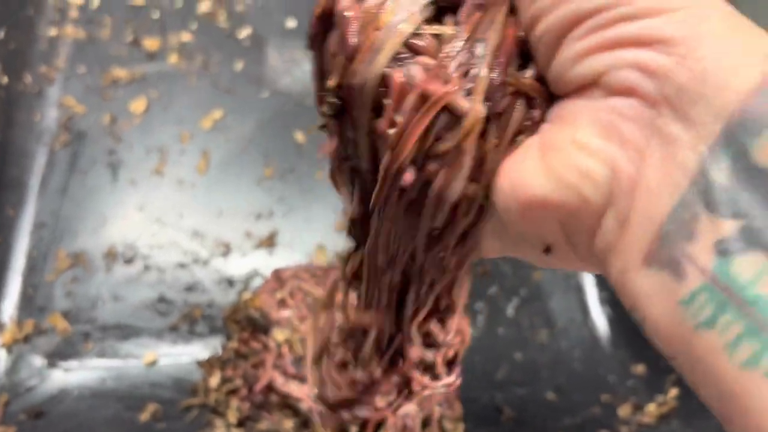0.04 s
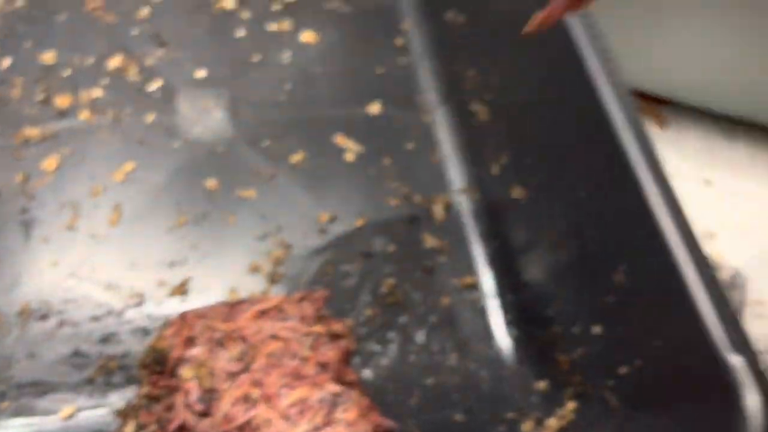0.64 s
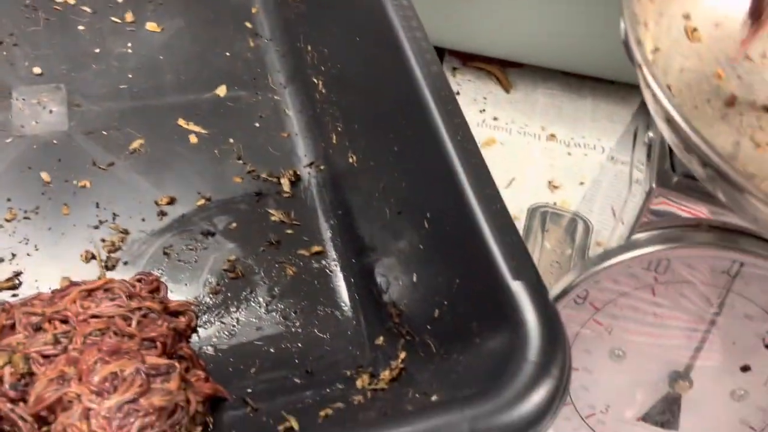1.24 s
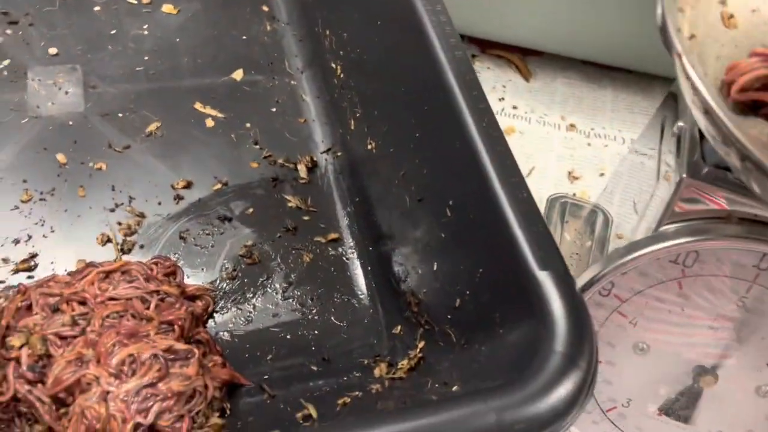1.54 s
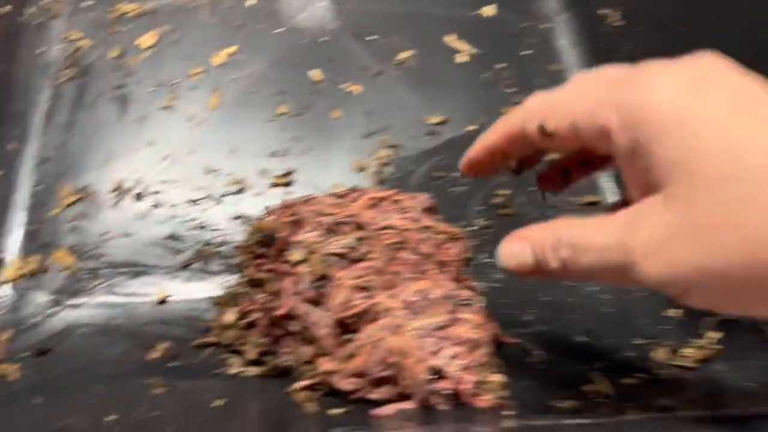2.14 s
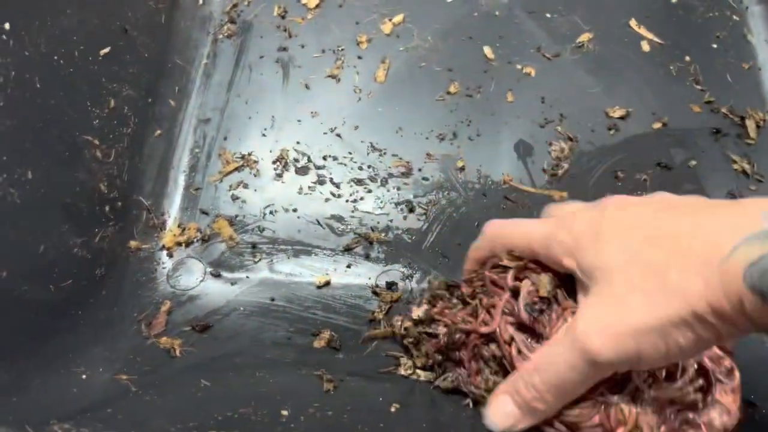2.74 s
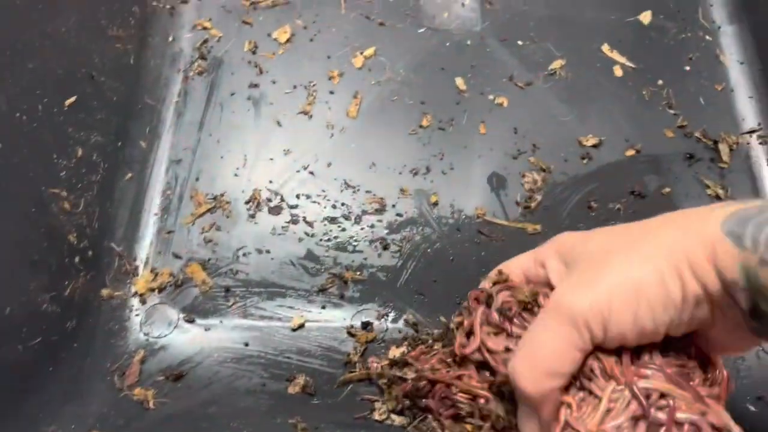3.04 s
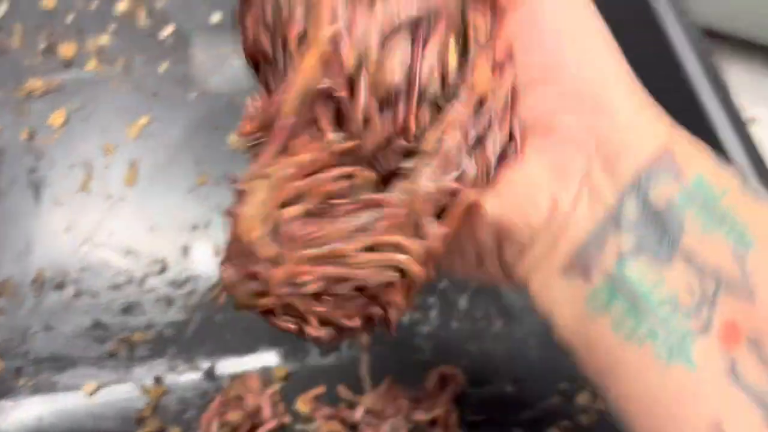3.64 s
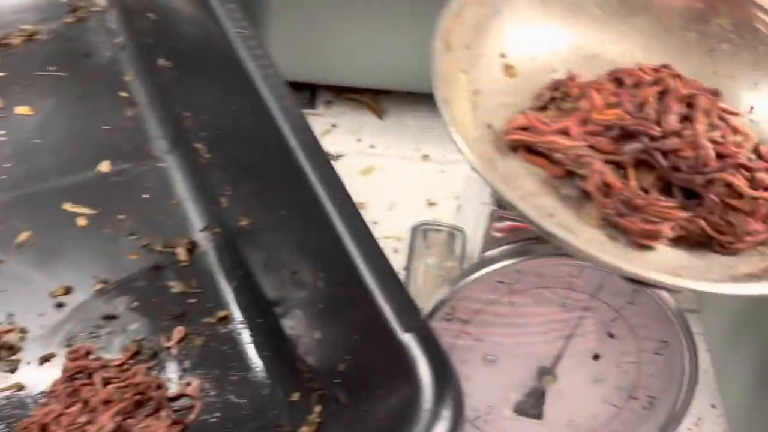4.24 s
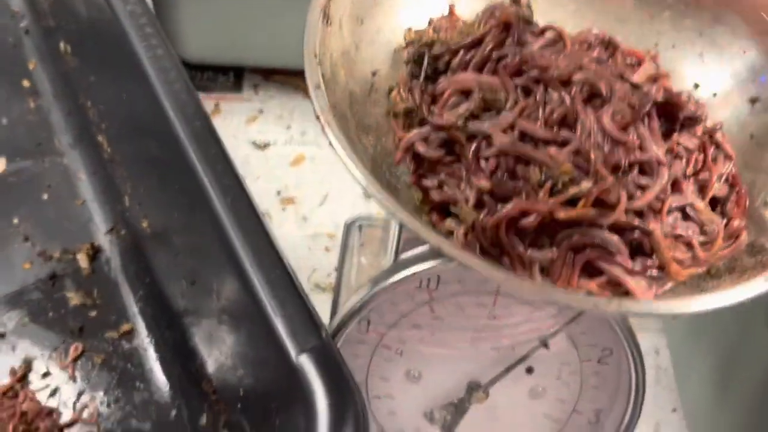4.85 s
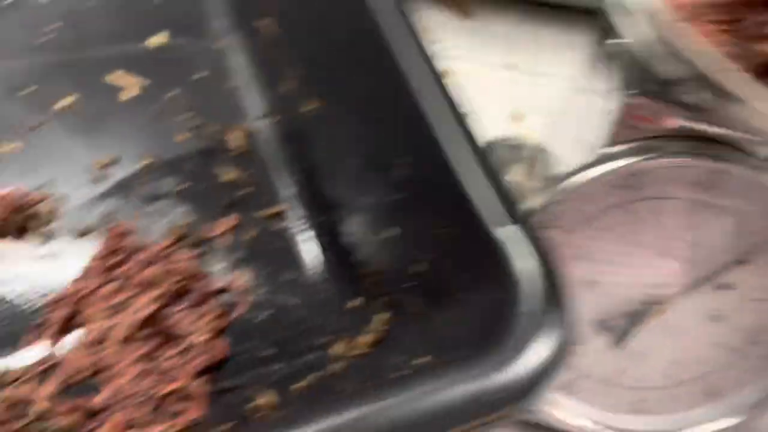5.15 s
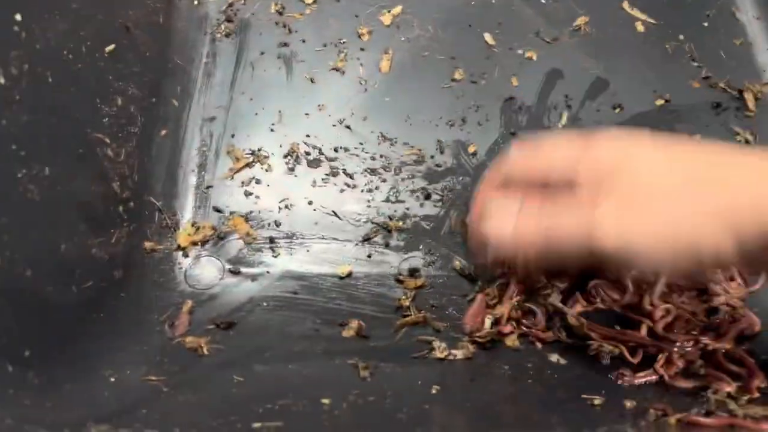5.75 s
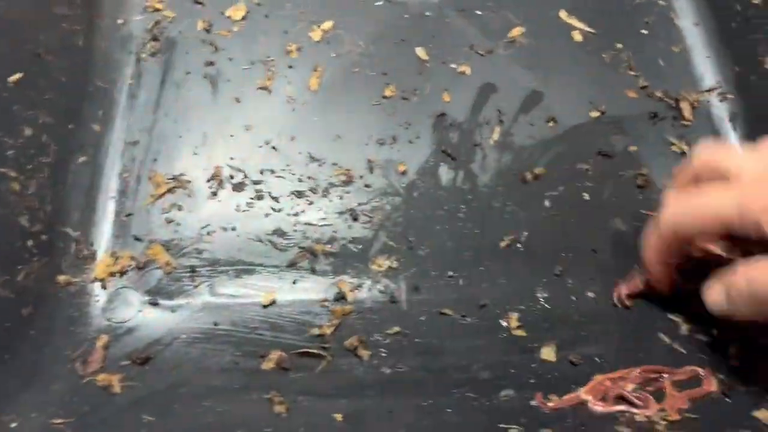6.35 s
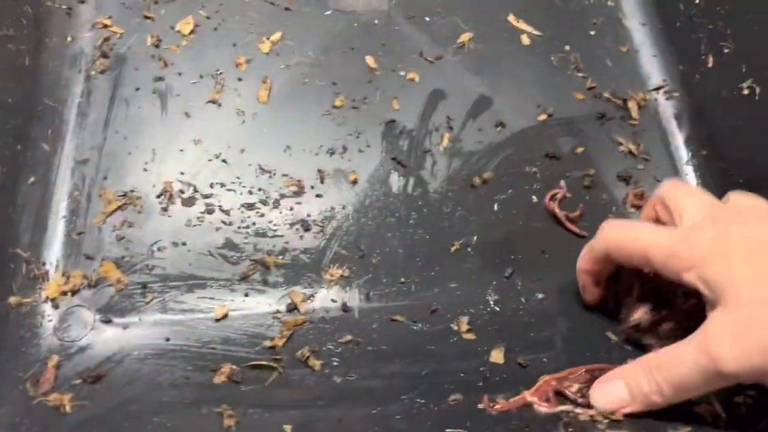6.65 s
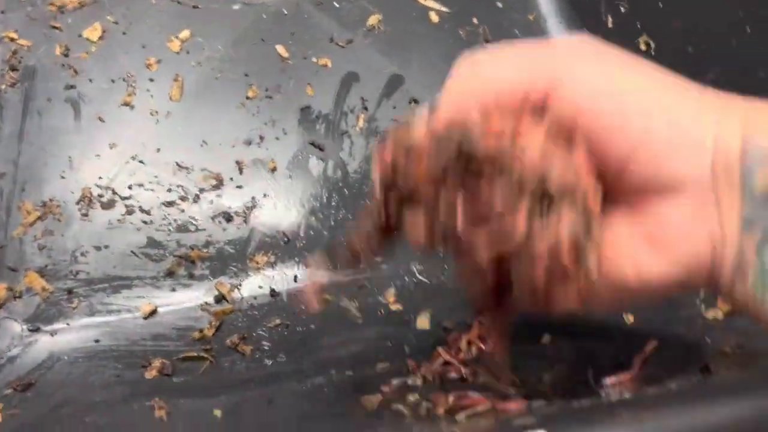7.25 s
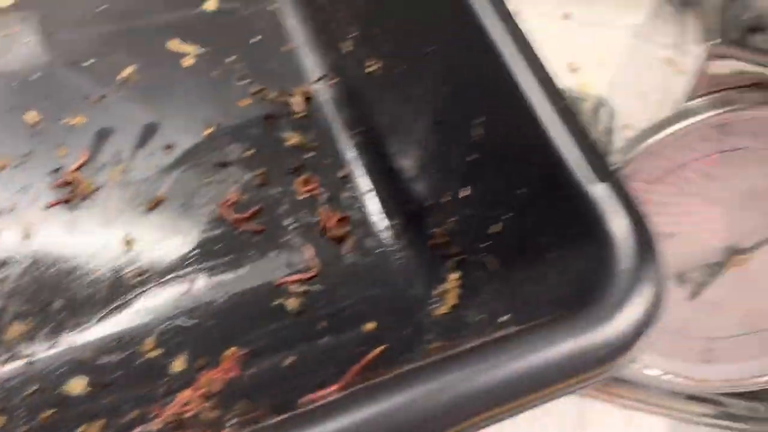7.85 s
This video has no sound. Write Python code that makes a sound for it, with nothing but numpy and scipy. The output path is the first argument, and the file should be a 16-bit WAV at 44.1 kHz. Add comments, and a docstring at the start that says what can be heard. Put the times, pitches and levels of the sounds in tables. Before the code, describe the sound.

A hand scoops a wet mass of worms from a thin plastic tray, making soft squelches, fine crackles and tiny pops. A handful patters dully into a metal bowl. The mass is then dragged with a gritty rumble, and a damp fingertip squeaks twice. Several hollow knocks on the tray follow, along with a brief fizzing wipe, while small wet sounds continue. The microphone is close, in a small room with a faint hum.

```python
"""Small room, phone microphone close to a thin plastic tray: a hand scoops compost worms into a bowl.
Over a faint hum, wet films and bubbles crackle, squelch and pop; fingers and clumps land, sending bending
waves through the tray. A handful patters into the metal bowl at 1.5 s. Near 2.9 s the dragged mass rumbles
and rasps, and a damp fingertip squeaks twice. Then come a hard landing (3.9 s), a softer handful (4.6 s),
another landing (5.6 s), a fizzing wipe (6.1 s) and the heaviest landing (6.4 s); small wet sounds go on."""
import sys
import numpy as np
from scipy import signal
from scipy.fft import rfft, irfft
from scipy.io import wavfile
from scipy.ndimage import uniform_filter1d

SR = 44100
rng = np.random.default_rng(int(sys.argv[2]) if len(sys.argv) > 2 else 0)


def store_wav(level_fs):
    """Save 16-bit WAV to argv[1]."""
    pcm = np.round(np.clip(np.atleast_2d(level_fs), -1, 1) * 32767)
    wavfile.write(sys.argv[1], SR, pcm.T.astype(np.int16))


N = 352800
TIME = np.arange(N) / SR


def undb(db):
    """Decibels to gain."""
    return 10 ** (np.asarray(db) / 20)


def unit(x):
    """Scale to rms 1."""
    return x / np.sqrt(np.mean(x ** 2))


def peaked(x, db):
    """Scale to a peak level."""
    return x * undb(db) / np.abs(x).max()


def decay(t, t60):
    """Envelope that falls 60 dB in t60 seconds."""
    return np.exp(-np.log(1000) * t / t60)


def band(x, low_hz, high_hz, order=2):
    """Causal band-pass."""
    return signal.sosfilt(signal.butter(order, [low_hz, high_hz], "band", fs=SR, output="sos"), x)


def ring(x, response):
    """Pass a sound through an impulse response."""
    return signal.fftconvolve(np.atleast_2d(x), np.atleast_2d(response), axes=1)[:, :x.shape[-1]]


def tint(x, colour, size=4096):
    """Minimum-phase filter through (f/Hz, gain/dB) points."""
    hz, db = np.transpose(colour)
    bin_hz = np.arange(size // 2 + 1) * SR / size
    gain = undb(np.interp(np.log(bin_hz + 1), np.log(hz), db))
    cepstrum = irfft(np.log(gain))
    cepstrum[1:size // 2] *= 2
    cepstrum[size // 2 + 1:] = 0
    return ring(x, irfft(np.exp(rfft(cepstrum))))


def sides(pan_db):
    """Gains at the two microphone ports; pan is left minus right."""
    return undb(np.array([[pan_db], [-pan_db]]) / 2)


def widen(shared, opposed, width):
    """Stereo from a mid and a side signal."""
    return shared + width * opposed * np.array([[1], [-1]])


def add(out, start, x):
    """Mix a sound in at a time in seconds."""
    i = max(int(start * SR), 0)
    out[:, i:i + x.shape[-1]] += x[..., :N - i]


def slips(per_s, spread_db):
    """Random tiny impulses: many weak ones, a few strong."""
    size = undb(spread_db * np.minimum(rng.exponential(size=N), 4))
    return (rng.random(N) < per_s / SR) * size * rng.choice([-1, 1], N)


def surges(rate_hz, depth_db):
    """Gain that lurches at random, as a soft mass moves in fits."""
    drift = signal.sosfilt(signal.butter(2, rate_hz, fs=SR, output="sos"), rng.standard_normal(N))
    return unit(undb(depth_db * np.clip(unit(drift), -2, 2)))


def snap(hz, cycles, lag, size=160):
    """Damped pings of a few cycles, one row each, starting lag samples late."""
    turns = np.maximum(np.arange(size) - lag[:, None], 0) * hz[:, None] / SR
    return np.sin(2 * np.pi * turns) * np.exp(-turns / cycles[:, None])


def gesture(peak_s, swell_s, fade_s, roundness=1.244):
    """Effort of one hand movement: swells to 1 and fades."""
    away = np.maximum((peak_s - TIME) / swell_s, (TIME - peak_s) / fade_s)
    return np.exp(-np.minimum(away, 12) ** roundness)


# spectrum of the air in the small room: f/Hz, relative level/dB
AIR_COLOUR = [(15, -37), (25, -19.5), (53, 1.5), (80, 0.5), (190, -14), (754, -29), (962, -32), (1890, -26),
              (3920, -29), (7510, -30), (9070, -37.5), (10100, -57), (11900, -53.5), (13600, -37.5),
              (16000, -70.5)]


def room_tone(air_db=-68, hum_hz=78.4, hum_db=-69.5):
    """Quiet air all round the microphone, with a wavering appliance hum."""
    shared, opposed = rng.standard_normal((2, N))
    air = unit(tint(widen(shared, band(opposed, 270, 18000), 0.5), AIR_COLOUR))
    hum = unit(band(rng.standard_normal(N), hum_hz - 3, hum_hz + 3))
    return undb(air_db) * air + undb(hum_db) * hum


def crackle(count, low_hz, high_hz, spread_db, cycles, lag_samples):
    """Wet films breaking all over the mass; each reaches the two ports with its own lag."""
    when, pitch, strength, place, length = rng.random((count, 5)).T
    hz = low_hz + (high_hz - low_hz) * pitch
    size = undb(spread_db * np.minimum(-np.log(strength), 3)) * np.sqrt(hz)
    ports = []
    for side in (1, -1):
        lag = 10 + side * lag_samples * (place - .5)
        pings = size[:, None] * snap(hz, cycles * (.5 + length), lag)
        index = (when * N).astype(int)[:, None] + np.arange(pings.shape[1])
        ports.append(np.bincount(index.ravel(), pings.ravel(), N)[:N])
    return unit(np.array(ports))


# worms stretched apart: strongest at t/s, swell/s, fade/s, wet level/dB
PEELS = [(0.04, 0.17, 0.45, -62), (0.181, 0.049, 0.078, -55), (1.102, 0.033, 0.064, -61),
         (1.35, 0.14, 0.1, -56), (2.1, 0.98, 0.095, -73), (3.15, 0.075, 0.35, -59),
         (3.62, 0.18, 0.17, -54.5), (4.52, 0.16, 0.088, -52.5), (4.85, 0.86, 0.46, -64),
         (5.741, 0.057, 0.052, -52.5), (6.099, 0.11, 0.17, -61.5), (7.031, 0.18, 0.098, -59.5),
         (7.424, 0.0068, 0.0097, -55.5), (7.99, 0.12, 0.087, -57.5)]
# the mass pushed or set down: strongest at t/s, swell/s, fade/s, drag level/dB, rasp level/dB
PUSHES = [(0.199, 0.026, 0.02, -52, -66), (1.44, 0.044, 0.17, -54, -57.5), (1.68, 0.035, 0.094, -58, -61.5),
          (2.532, 0.044, 0.059, -43.5, -49.5), (2.82, 0.13, 0.078, -39.5, -40),
          (2.93, 0.13, 0.065, -46.5, -46.5), (3.1, 0.6, 0.21, -66.5, -57),
          (3.581, 0.094, 0.068, -54.5, -55), (3.97, 0.036, 0.12, -56, -56.5),
          (4.573, 0.074, 0.073, -61.5, -51), (4.94, 0.076, 0.054, -68.5, -60),
          (5.479, 0.15, 0.36, -64, -62.5), (5.65, 0.059, 0.089, -45.5, -55),
          (6.121, 0.19, 0.13, -55, -51.5), (6.27, 0.086, 0.044, -51.5, -58.5),
          (6.528, 0.056, 0.16, -42.5, -49), (6.67, 0.019, 0.064, -46.5, -54),
          (6.859, 0.16, 0.23, -68.5, -59), (7.262, 0.028, 0.012, -59.5, -65.5),
          (7.35, 0.034, 0.092, -61, -68.5), (7.99, 0.086, .1, -88, -60.5)]


def efforts(crawl_wet_db=-80.5, crawl_rasp_db=-89.5, squeeze_db=-5.5):
    """Drag, rasp and wet envelopes over the worms' own crawl: pushes drive all three, peels the last."""
    drag_power, rasp_power, wet_power = 0, undb(crawl_rasp_db) ** 2, undb(crawl_wet_db) ** 2
    for peak_s, swell_s, fade_s, drag_db, rasp_db in PUSHES:
        push = gesture(peak_s, swell_s, fade_s)
        drag_power += (undb(drag_db) * push) ** 2
        rasp_power += (undb(rasp_db) * push) ** 2
    for peak_s, swell_s, fade_s, db in PEELS:
        wet_power += (undb(db) * gesture(peak_s, swell_s, fade_s)) ** 2
    wet_power += undb(squeeze_db) ** 2 * rasp_power
    return np.sqrt([drag_power, rasp_power, wet_power])


# ways across the tray, direct and by the rims: length/direct path, gain/ratio
TRAY_PATHS = [(0.999, 0.059), (2.1, -0.016), (3.4, 0.27), (5.202, -0.32), (7.7, 0.33)]


def bending_wave(travel_ms, loss, extra_path=0.031, damped_s=0.01, size=16384):
    """Treble outruns bass in a thin plate: a falling chirp, echoed by the rims; travel_ms is at 1 kHz."""
    hz = np.arange(size // 2 + 1) * SR / size
    phase = 4 * np.pi * travel_ms * np.sqrt(hz / 1000)
    wave = sum(gain * np.exp(-(1j + loss) * path * phase) for path, gain in TRAY_PATHS)
    ports = np.exp(-1j * np.outer([0, extra_path], phase))  # the right port is farther off
    chirp = irfft(ports * wave / (1 + 1j * hz / 600))  # low-pass at 600 Hz
    return chirp * np.exp(-np.arange(size) / SR / damped_s)  # the soft load soaks up slow, late waves


# modes of the plastic tray: f/Hz, relative level/dB, t60/s
TRAY_MODES = [(74.5, 2.5, 0.35), (141.9, -3.5, 0.42), (252.2, -0.5, 0.33), (383, 1, 0.2), (463, -1.5, 0.18),
              (533, -5.5, 0.063), (648, -2.5, 0.13), (845, 1.5, 0.17), (1133, -3, 0.061), (1450, -14, 0.1),
              (1750, -6.5, 0.09)]


def tray_modes(detune=0, size=16384):
    """Free ringing of the tray, one row a mode; the shifting load detunes each."""
    t = np.arange(size) / SR
    shifts = 1 + detune * rng.uniform(-1.1, 1, len(TRAY_MODES))
    return np.array([undb(db) * np.sin(2 * np.pi * hz * shift * t) * decay(t, t60)
                     for (hz, db, t60), shift in zip(TRAY_MODES, shifts)])


def hollow(hz, width_hz):
    """A wet cavity between hand, worms and tray: slips ring it; its pitch wanders as it changes shape."""
    pitch = hz * surges(13.1, 1.2)
    turn = np.exp(2j * np.pi * np.cumsum(pitch) / SR)
    pole = np.exp(-np.pi * width_hz / SR)
    ringing = signal.lfilter([1], [1, -pole], slips(400, 2.2) / turn) * turn
    return unit(band(ringing.real, hz / 2, hz * 2))


# close-up spectra of the dragged mass, the grit and the wet films: f/Hz, relative level/dB
DRAG_COLOUR = [(35, -27.5), (60, 6), (85, 2), (140, -1.5), (280, -8.5), (400, -3.5), (650, -4), (900, -1.5),
               (1400, -27), (3000, -44.5)]
GRIT_COLOUR = [(400, -23), (900, -2.5), (1300, 6.5), (2000, 4.5), (3200, -2), (5000, -4.5), (9000, -33.5),
               (16000, -79.5)]
FILM_COLOUR = [(800, -15), (2000, -3), (4000, -8.5), (6500, -6), (8700, -1), (10000, -14.5), (12000, -4.5),
               (14000, -20), (15500, -11.5)]


def handling(grit_db=-1, hollow_db=-7, fizz_db=-3, bubble_db=-8, tray_ring_db=-22, merge_db=-56):
    """The mass sticks and slips on the tray, grit rasps under it, hollows ring and the wet worms part."""
    drag, rasp, wet = efforts()
    plate = peaked(bending_wave(travel_ms=2.028, loss=0.058), 0)
    plate += peaked(tray_modes().sum(0), tray_ring_db)
    stick_slip = widen(slips(900, 4.5), slips(800, 5.64), 0.26)
    rumble = unit(tint(ring(stick_slip, plate), DRAG_COLOUR))
    grit = unit(tint(widen(slips(3500, 3.1), slips(3100, 0.86), 0.41), GRIT_COLOUR))
    bubbles = crackle(count=700, low_hz=1063, high_hz=4580, spread_db=1, cycles=5.9, lag_samples=27)
    films = crackle(count=1800, low_hz=4820, high_hz=13380, spread_db=4, cycles=4.2, lag_samples=2.46)
    films = unit(tint(films, FILM_COLOUR))
    dense_snaps = widen(slips(6000, 0.89), slips(5200, 0.44), 0.84)
    fizz = unit(tint(dense_snaps, FILM_COLOUR)) * surges(120, 1.2)
    # under pressure the separate snaps merge into a smooth fizz
    loose = 1 / (1 + (wet + drag) / undb(merge_db))
    parting = np.sqrt(loose) * films + undb(fizz_db) * np.sqrt(2 * (1 - loose)) * fizz
    scrape = undb(grit_db) * np.sqrt(1 - loose) * grit + undb(bubble_db) * 2 * loose * bubbles
    hollows = undb(hollow_db) * np.sqrt(drag * rasp) * (hollow(481, 70) + hollow(1365, 160))
    lurch = surges(rate_hz=16.2, depth_db=3)
    return lurch * (drag * rumble + rasp * scrape + hollows) + wet * parting


# bubble clusters between the worms: t/s, peak level/dB, centre f/Hz, half the spread of onsets/s
SQUELCHES = [(0.131, -48, 2200, 0.0013), (1.086, -49, 2410, 0.0042), (1.293, -43.5, 2440, 0.006),
             (1.423, -40, 2580, .009), (1.464, -43.5, 2620, 0.0041), (1.541, -39.5, 2300, .005),
             (1.667, -51, 2400, .008), (1.778, -48, 3660, 0.0036), (2.214, -54, 2760, .0015),
             (2.295, -52.5, 1460, 0.0028), (2.427, -46.5, 1790, .008), (3.331, -50, 1900, .0015),
             (3.442, -42.5, 1980, 0.0034), (3.545, -38.5, 2000, .008), (4.456, -45, 1690, 0.00284),
             (4.589, -41.5, 1400, 0.0048), (5.158, -48, 2800, 0.0041), (6.037, -36, 1760, 0.0017),
             (7.329, -46, 2010, 0.0036), (7.346, -46.5, 2100, 0.0045), (7.421, -45, 2230, 0.0037),
             (7.955, -45.5, 2100, 0.0011)]


def squelches(count=11, spread_octaves=0.992, cycles=6.3, rise=0.12, froth_db=-16, lag_samples=3):
    """Wet worms slap together and squeeze out tiny bubbles, each with its own rising ring."""
    out, t = np.zeros((2, N)), np.arange(SR // 16) / SR
    for start, db, centre_hz, half_s in SQUELCHES:
        when, pitch, place = rng.random((3, count, 1))
        span_s = 2 * half_s
        delay = span_s * when ** 2
        hz = centre_hz * 2 ** (spread_octaves * (2 * pitch - 1))
        ports = []
        for side in (1, -1):
            turns = np.maximum(t - delay - side * lag_samples * (place - .5) / SR, 0) * hz
            phase = 2 * np.pi * turns * (1 + rise * np.tanh(turns / cycles / 2))
            bubbles = np.sin(phase) * np.exp(-turns / cycles - delay / span_s)
            ports.append(bubbles.sum(0))
        froth = band(widen(*rng.standard_normal((2, len(t))), .5), centre_hz / 2, centre_hz * 2)
        cluster = peaked(np.array(ports), 0) + peaked(froth * np.exp(-t / span_s), froth_db)
        add(out, start, peaked(cluster, db) * sides(pan_db=2))
    return out


# fingers and clumps landing on the tray, or in the bowl around 1.5 s; levels before the trims:
# t/s, body level/dB, body f/Hz, thump/dB, knock/dB, smack/dB (these three re the body), smack pan/dB
LANDINGS = [(0.178, -45.5, 400, 3, 6, 10, 10.5), (1.39, -40.5, 313, -4.5, -13, -23, -8),
            (1.422, -39, 395, -11, -3, 5.5, 0), (1.468, -39.5, 673, -11, -1, 0, -2),
            (1.67, -43, 383, -6, -5, 2, -2), (2.437, -41.5, 650, 4, -6.5, -8, 0),
            (2.499, -30, 608, -25, -4, -27, -1), (3.8628, -16.5, 687, -10, 4.5, 7.5, 3.5),
            (4.067, -32.5, 656, -6.5, -17, -17, 0), (5.5795, -19.5, 471, -6.5, 0, -7, 0.5),
            (5.649, -30.5, 601, -5, 1, -9, -2), (5.911, -31, 385, 0, 0, -13, 6),
            (5.941, -36.5, 470, -12, 2.5, -4.5, 8), (6.421, -12.5, 496.6, -5, -8.5, -16, 0),
            (6.434, -17.5, 365, -15, -1, -4.5, 3), (6.519, -32.5, 365, 0.5, -17, -15, 8),
            (6.611, -31.5, 310, -11, -17, -22.5, 3.5), (7.7329, -30, 488.6, -12, -2, 1.5, -3),
            (7.748, -34, 267, -12, -15, -20, -4)]
# spectrum of the smacked wet film: f/Hz, relative level/dB
SMACK_COLOUR = [(1200, -17.5), (2700, -4), (3700, -4), (4800, -4.5), (6000, -3.5), (8500, -3.5),
                (10000, -21.5), (12500, -13), (16000, -35)]


def landings(low_trim_db=-1, high_trim_db=-2, rise_s=0.00045, smack_s=0.0017, splash_s=0.035):
    """Each landing bends a thin wall, smacks its wet film and splashes; all ring with the tray's modes."""
    out, modes = np.zeros((2, N)), tray_modes()
    t = np.arange(SR // 8) / SR
    spray = (1 - np.exp(-t / rise_s)) * (np.exp(-t / smack_s) + undb(-26) * np.exp(-t / splash_s))
    bass_ring = peaked(band(modes.sum(0), 48, 190), -6)
    for start, db, hz, thump_db, knock_db, smack_db, pan_db in LANDINGS:
        low_db, high_db = db + low_trim_db, db + high_trim_db
        travel_ms = 1.95 * (453.4 / hz) ** 0.865  # longer for a lower-pitched blow
        wave = peaked(bending_wave(travel_ms, loss=0.03), 0)
        shape = rng.uniform(0.67, 1, len(modes))  # every spot drives the modes differently
        age = np.arange(wave.shape[1]) / SR
        # ribs and corners break the wave up
        scatter = band(rng.standard_normal(len(age)), 150, 1700, order=1) * np.exp(-age / 0.019)
        plate = wave + peaked(shape @ tray_modes(detune=.05), -13) + peaked(scatter, -16)
        sway = peaked(band(wave, 111.8, 185.3, order=3), 0) + bass_ring
        thump = peaked(sway, low_db + thump_db)
        # a softer, longer contact drives lower modes
        body = peaked(band(plate, hz / 1.505, hz * 1.62, order=3), low_db)
        knock = peaked(band(plate, 1010, 2700, order=3), high_db + knock_db)
        add(out, start, thump + body + knock * sides(pan_db / 2))
        smack = tint(widen(*rng.standard_normal((2, len(t))), 0.45) * spray, SMACK_COLOUR)
        add(out, start + 0.00024, peaked(smack, high_db + smack_db) * sides(pan_db))
    return out


# the largest wet films snapping: t/s, peak level before the trim/dB, f/Hz
POPS = [(0.268, -44, 7050), (0.41, -44, 8140), (0.565, -54, 8000), (0.598, -48, 4800), (0.687, -50.5, 6560),
        (1.048, -44, 10700), (1.063, -38.5, 7340), (1.09, -36, 8200), (1.118, -44, 8700),
        (1.134, -42, 9800), (1.225, -42.5, 8700), (1.233, -41, 10700), (1.335, -33, 8700),
        (2.24, -45.5, 8100), (3.384, -47, 7100), (3.485, -45.5, 4500), (3.632, -36.5, 5800),
        (3.798, -42, 8750), (4.243, -47, 6640), (4.26, -42, 8830), (4.4887, -35, 7560), (5.016, -48, 8440),
        (5.121, -43.5, 8470), (5.146, -45, 8000), (7.034, -48, 3800), (7.085, -40, 7960),
        (7.2916, -45, 4640), (7.431, -42.5, 8100), (7.7732, -39, 7000), (7.956, -42, 7550)]


def pops(trim_db=1, tear_db=-9, tear_s=0.000062, spray_db=-20, spray_s=0.0053):
    """Single films tear to either side of the microphone: a broad tick, a brief ping, a short spray."""
    out, t = np.zeros((2, N)), np.arange(SR // 100) / SR
    envelope = undb(tear_db) * np.exp(-t / tear_s) + undb(spray_db) * np.exp(-t / spray_s)
    for start, db, hz in POPS:
        ping = snap(np.full(2, hz), cycles=np.full(2, 5.0), lag=np.array([0, 0.73]), size=len(t))
        tear = unit(band(widen(*rng.standard_normal((2, len(t))), 0.76), hz / 3, hz * 1.6)) * envelope
        pan_db = rng.normal(1, 8.5)
        add(out, start + 0.0007, peaked(ping + tear, db + trim_db) * sides(pan_db))
    return out


# air pockets closing in the mass: t/s, peak level before the trim/dB, mid-glide f/Hz
PLOPS = [(0.359, -47, 356), (1.605, -44, 368), (2.223, -47.5, 1230), (2.524, -34, 883), (2.575, -35, 1200),
         (3.441, -43.5, 910), (3.541, -44, 506), (3.561, -38.5, 520), (3.863, -15.5, 1084),
         (4.068, -33.5, 842), (4.455, -37.5, 1360), (4.546, -43, 380), (5.075, -48.5, 1490),
         (5.65, -32.5, 1350), (5.914, -30.5, 445), (5.944, -35.5, 460), (6.523, -29, 440),
         (7.328, -47.5, 930), (7.42, -41, 460), (7.437, -42, 467), (7.733, -31.5, 1347),
         (7.888, -49.5, 1420)]


def plops(trim_db=-1, cycles=2.65, sag=0.24, froth_db=-8, settle_db=-22, settle_s=0.019):
    """Left of centre, a soft air pocket swells and sinks in pitch; worms settle round it with a froth."""
    out, t = np.zeros((2, N)), np.arange(SR // 8) / SR
    for start, db, hz in PLOPS:
        age = t * hz / cycles
        swell = age * np.exp(-age)
        pitch = hz * (1 + sag * (np.exp(-age / 3) - .5))
        tone = swell * np.sin(2 * np.pi * np.cumsum(pitch) / SR)
        froth = unit(band(rng.standard_normal(len(t)), hz * 0.34, hz * 1.41))
        settling = undb(settle_db) * (1 - np.exp(-age)) * np.exp(-t / settle_s)
        plop = tone + (undb(froth_db) * swell + settling) * froth
        add(out, start, peaked(plop, db + trim_db) * sides(pan_db=3.5))
    return out


# handfuls slithering into the bowl: strongest at t/s, swell/s, fade/s, level/dB
HANDFULS = [(1.49, 0.069, 0.15, -47.5), (4.579, 0.061, 0.1, -56)]
# modes of the metal bowl: f/Hz, relative level/dB
BOWL_MODES = [(220.7, -62), (301.5, -63), (366.1, -57), (613.7, -70), (662.1, -71.5), (807.5, -65)]


def bowl(t60=0.17):
    """Worms patter into the metal bowl; their own weight damps its ringing."""
    t = np.arange(SR // 3) / SR
    modes = sum(undb(db) * np.sin(2 * np.pi * hz * t) for hz, db in BOWL_MODES) * decay(t, t60)
    patter = unit(ring(widen(slips(330, 3), slips(300, 3), 0.16), modes))
    return patter * sum(undb(db) * gesture(*timing) for *timing, db in HANDFULS)


# a fingertip slipping on the tray, one curve a squeak: t/s, slip rate f/Hz, level/dB
SQUEAKS = [
    [(2.8495, 1450, -42), (2.853, 1350, -27), (2.858, 1290, -27), (2.865, 1460, -31), (2.877, 1640, -32),
     (2.881, 2000, -44)],
    [(2.908, 1370, -45), (2.912, 1330, -26), (2.917, 1325, -26), (2.924, 1395, -29), (2.931, 1410, -26),
     (2.943, 1410, -25), (2.955, 1490, -36), (2.96, 1700, -24), (2.965, 2100, -40)],
]
# its harmonics, from the fundamental up: relative level/dB
SQUEAK_HARMONICS = [0, -4.5, -14, -14, -20, -26]


def squeaks(jitter=.008, lag_s=.00005, rub_db=-26, ring_hz=1420, ring_t60=0.18, ring_db=-14):
    """A damp fingertip sticks and slips, flicks up and loses overtones as it lets go; the tray rings."""
    out = np.zeros((2, N))
    for curve in SQUEAKS:
        times, hz, db = np.transpose(curve)
        t = np.arange(times[0], times[-1], 1 / SR)
        rate = np.interp(t, times, hz)
        waver = 1 + jitter * unit(uniform_filter1d(rng.standard_normal(len(t)), size=40))
        phase = 2 * np.pi * np.cumsum(rate * waver) / SR
        phase = phase - 2 * np.pi * np.outer([0, lag_s], rate)  # it reaches the right port later
        first, *overtones = (undb(h) * np.sin(k * phase) for k, h in enumerate(SQUEAK_HARMONICS, 1))
        grip = np.interp(rate, [1500, 1720], [1, .15])
        hiss = unit(band(rng.standard_normal(len(t)), 1200, 3700, order=1))
        wet_rub = undb(rub_db) * hiss * (1 + np.sin(phase))
        tone = first + (grip * sum(overtones) + wet_rub) * sides(pan_db=4)
        add(out, times[0], undb(np.interp(t, times, db)) * tone)
    out *= surges(rate_hz=350, depth_db=0.8)  # flutter
    t = np.arange(SR // 4) / SR
    close_modes = band(rng.standard_normal(len(t)), ring_hz / 0.914, ring_hz * 1.14, order=1)
    ringing = ring(out, close_modes * decay(t, ring_t60))
    return out + peaked(ringing, ring_db) * np.abs(out).max()


def wipe(peak_s=6.12, spread_s=0.125, db=-49.5):
    """The film of moisture on the tray floor fizzes brightly and unevenly under sliding fingers."""
    fizz = unit(band(widen(slips(3000, 2.5), slips(3000, 2.5), 0.38), 3100, 15800, order=3))
    return undb(db) * np.exp(-((TIME - peak_s) / spread_s) ** 2) * fizz


def reflections(x, near_db=-14, near_s=0.0099, far_db=-18, t60=0.16):
    """The tray walls answer at the microphone after 1 ms, the small room after 7 ms."""
    t = np.arange(SR // 2) / SR
    noise = rng.standard_normal((6, len(t)))
    near = band(widen(*noise[:2], 1.0), 1100, 11000) * np.exp(-t / near_s) * (t > .001)
    low = band(widen(*noise[2:4], 0.33), 160, 3300)
    high = undb(-4.5) * band(noise[4:], 3300, 13000)
    far = (low + high) * decay(t, t60) * (t > .007)
    near *= undb(near_db) / np.linalg.norm(near[0])
    far *= undb(far_db) / np.linalg.norm(far[0])
    return ring(x, near + far)


def scene(squeak_room_db=-5):
    """The handling up close, the room behind it; the squeaks sound drier, with less room echo."""
    worms = landings() + plops() + squelches() + pops() + handling() + bowl() + wipe()
    finger = squeaks()
    return worms + finger + reflections(worms + undb(squeak_room_db) * finger) + room_tone()


# balance of the phone's microphone ports: f/Hz, left minus right level/dB
PORT_BALANCE = [(100, 0.8), (500, -2), (1200, 2), (2500, 5), (5000, 4), (8000, 1.5), (14000, -1.5)]


def record(dry, top_hz=16200):
    """The two microphone ports differ in colour; the top is cut."""
    left = tint(dry[0], [(hz, db / 2) for hz, db in PORT_BALANCE])
    right = tint(dry[1], [(hz, -db / 2) for hz, db in PORT_BALANCE])
    low_pass = signal.ellip(8, .2, 70, top_hz, fs=SR, output="sos")
    return signal.sosfilt(low_pass, np.vstack([left, right]))


dry = scene()
out = record(dry)
store_wav(out)
```